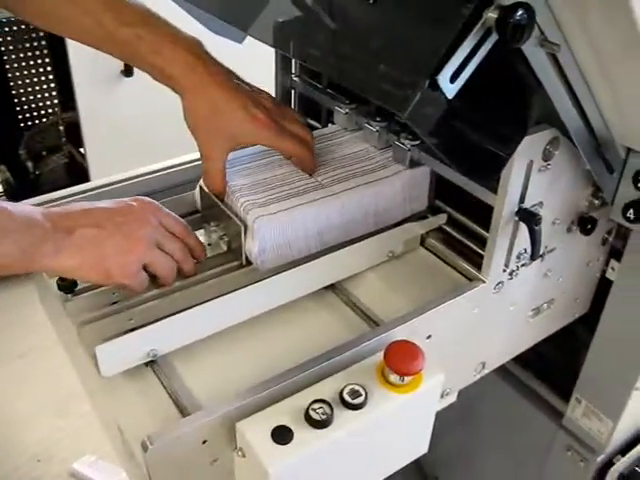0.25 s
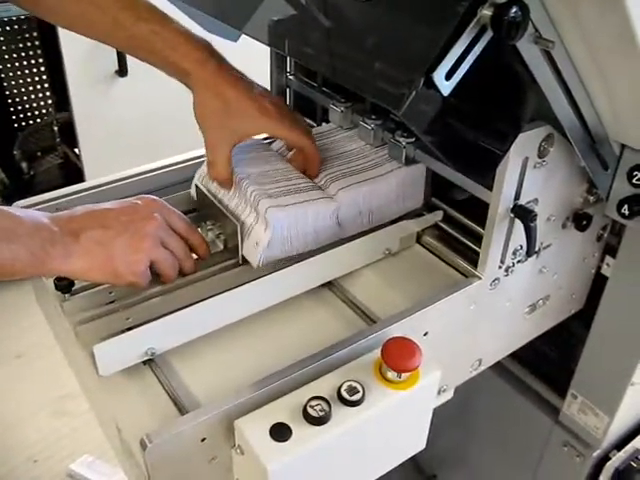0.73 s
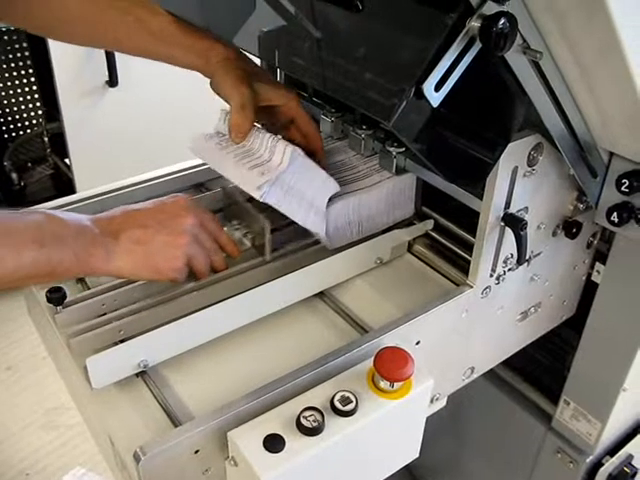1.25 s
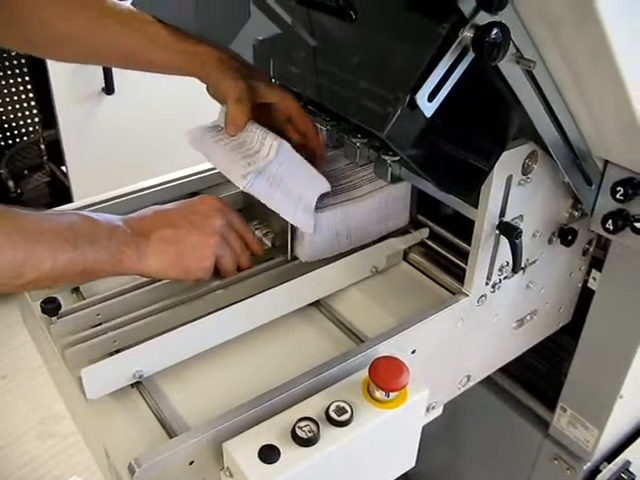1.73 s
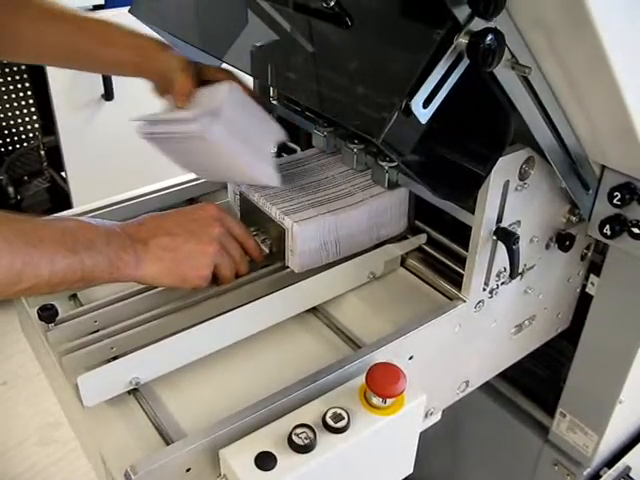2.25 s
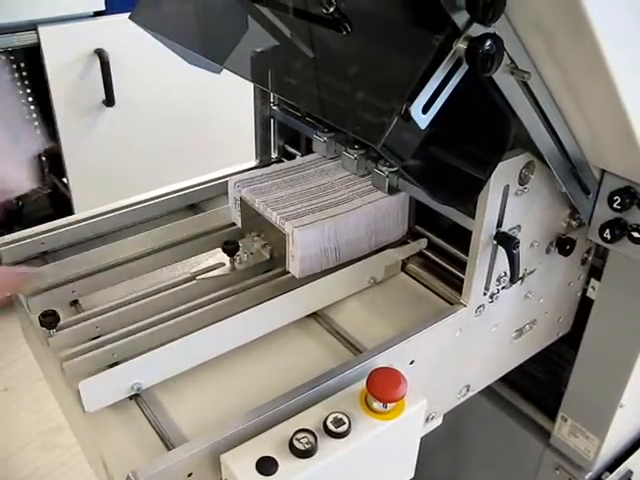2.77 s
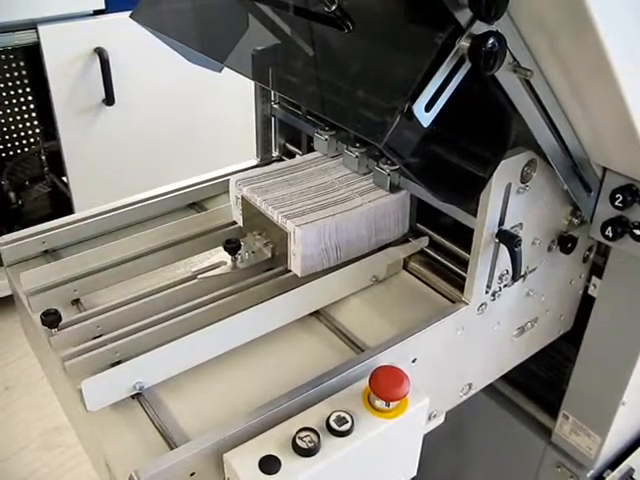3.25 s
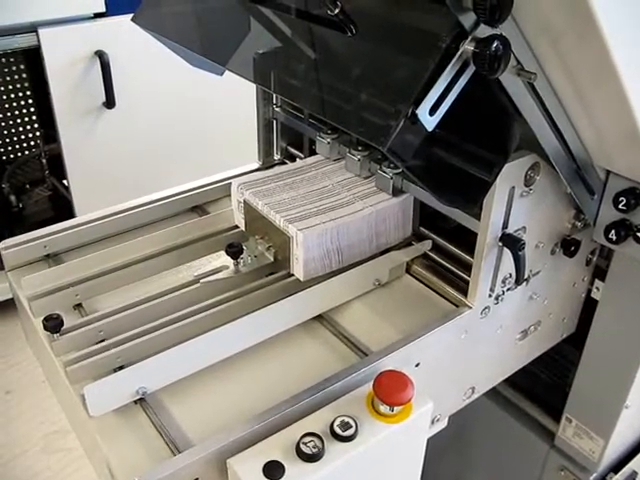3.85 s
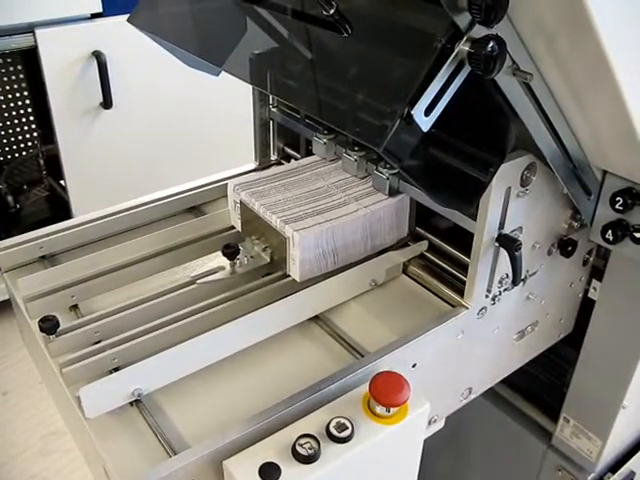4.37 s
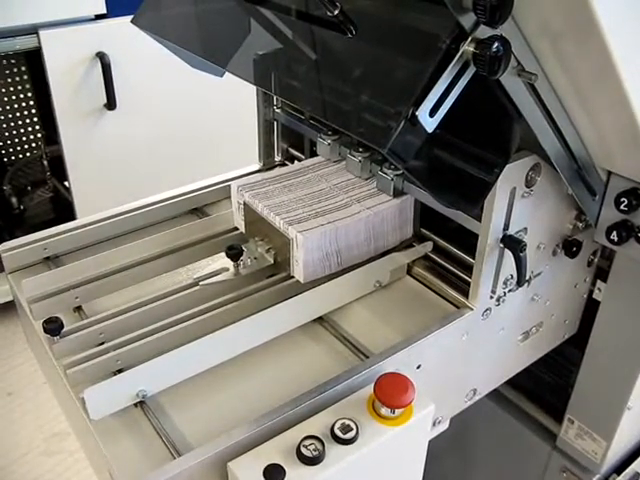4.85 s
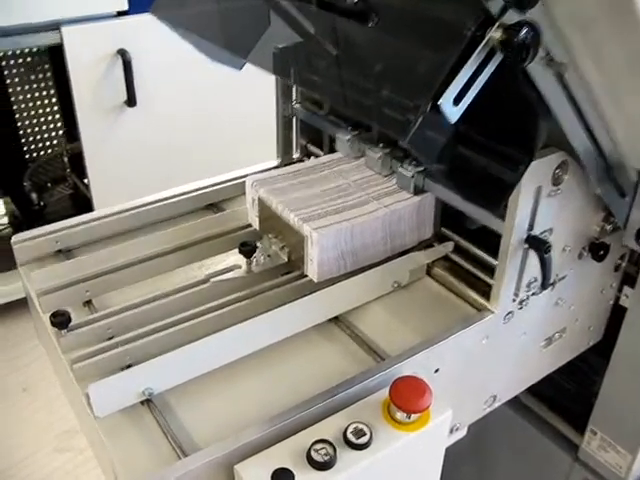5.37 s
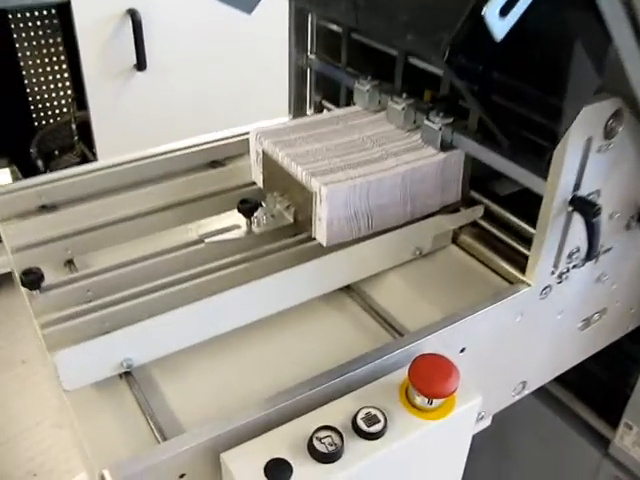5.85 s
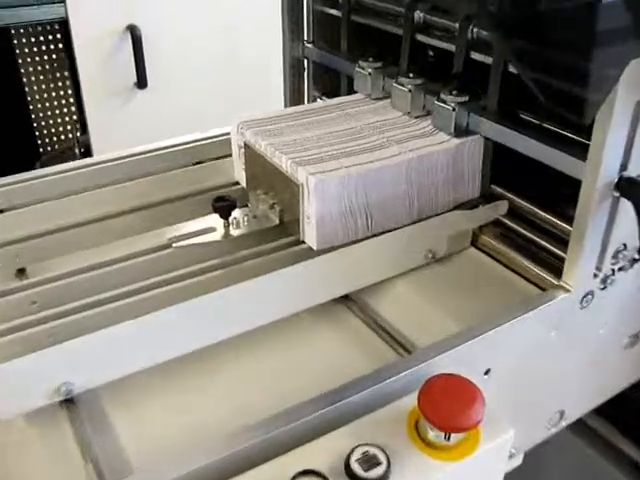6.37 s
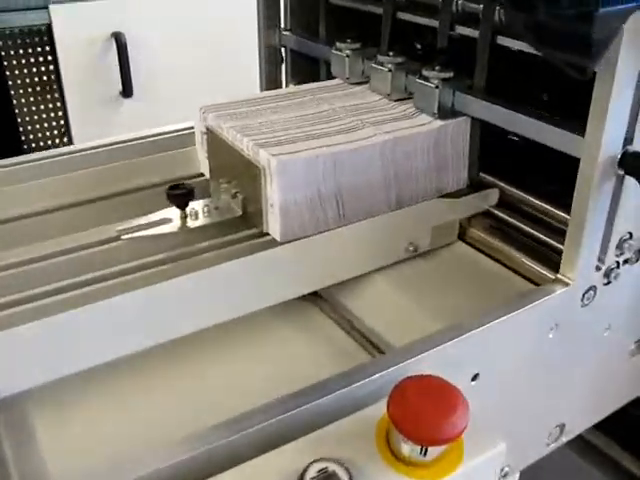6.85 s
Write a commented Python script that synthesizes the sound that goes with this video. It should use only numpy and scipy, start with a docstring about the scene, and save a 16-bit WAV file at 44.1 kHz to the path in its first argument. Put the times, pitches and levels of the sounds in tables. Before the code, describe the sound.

A paper folding machine snaps through sheets in a quick, even rhythm over hissing, whistling air and a steady hum.

```python
"""Quick triple snaps of paper, seven a second, over hissing, whistling air: a print shop's folding
machine, heard from just above its feed table. Air blows into the stack and sheets are sucked off it.
Each knocks twice on the fold plate and thumps out through the rollers, over the hum of the drive.
Near the end the sheets run late and crowd in the folder, then the folder empties and falls quiet."""
import sys
import numpy as np
from scipy import signal
from scipy.fft import rfft, irfft
from scipy.io import wavfile
from scipy.ndimage import uniform_filter1d, map_coordinates

SR = 44100
rng = np.random.default_rng(int(sys.argv[2]) if len(sys.argv) > 2 else 0)


def bounce(signal):
    """Save signal as a 16-bit WAV file at the path given by the first command-line argument."""
    frames = np.transpose(np.atleast_2d(signal))
    limited = np.clip(frames, -1, 1)
    pcm = np.round(limited * 32767).astype(np.int16)
    wavfile.write(sys.argv[1], SR, pcm)


N = 313551
TIME = np.arange(N) / SR
EMPTY_S, RUN_OUT_S = 6.69, .14  # folder empties: start, duration

# Paper click spectra: f/Hz, level/dB
PICKUP_SPECTRUM = [(300, -42), (1200, -13), (2400, -2.5), (3200, 1), (4100, 0), (5100, 1), (6200, -8),
                   (8300, -4.5), (15000, -43)]
FLICK_SPECTRUM = [(300, -39.5), (1200, -8.5), (2200, -1), (3000, 4.5), (4200, 4), (5000, -10), (6500, -8),
                  (8100, -2), (9200, -6), (15000, -44)]
SNAP_SPECTRUM = [(200, -25), (700, -11), (950, -8), (1250, -1.5), (1700, -2.5), (2000, -.5), (2500, .5),
                 (3300, -3.5), (4200, -6.5), (5400, -7.5), (8000, -13), (10000, -22), (15000, -29)]
# Sheets leaving the stack: snap t/s, relative flick level/dB, relative snap level/dB
SHEETS = [(.0282, -19, -13.5), (.1749, -15.5, -15.5), (.322, -17.5, -17), (.462, -22, -29),
          (.5996, -18, -16), (.7428, -17.5, -23), (.8857, -17.5, -17), (1.0344, -19.5, -14.5),
          (1.1846, -21, -16), (1.324, -21, -16), (1.4668, -20, -16), (1.614, -16.5, -17), (1.758, -17, -17),
          (1.9031, -18, -18), (2.0408, -21, -14), (2.187, -17.5, -18), (2.3283, -15.5, -13),
          (2.476, -16.5, -15), (2.6256, -18, -17), (2.7667, -19, -19), (2.9168, -16.5, -23),
          (3.0535, -46, -30), (3.2017, -24, -22), (3.347, -19, -15), (3.4852, -16.5, -15),
          (3.6273, -15.5, -15), (3.771, -18.5, -17), (3.9136, -23, -15), (4.059, -16.5, -15),
          (4.2065, -20, -14), (4.3443, -14.5, -21), (4.5018, -17, -21), (4.6427, -17, -18),
          (4.7887, -16, -12), (4.9315, -16.5, -19), (5.0706, -16.5, -13), (5.22, -17, -15),
          (5.3614, -20, -13), (5.5156, -18.5, -15), (5.6534, -16, -19.5), (5.8198, -16.5, -13.5),
          (5.9691, -15.5, -17), (6.124, -17.5, -13), (6.2865, -23, -11), (6.4292, -24, -10.5),
          (6.5857, -15, -11), (6.7613, -20, -20), (6.9125, -16, -11.5)]


def feeder(pickup_db=-18, pickup_follow=.33, crowded_db_per_s=35, flick_gain_db=2, snap_gain_db=3,
           valve_db=-27, grip_db=-27):
    """Per sheet: the valve ticks; the sheet lifts, flicks, snaps free and is gripped by the rollers."""
    out = np.zeros(N)
    pickup, flick, snap = impulse(PICKUP_SPECTRUM), impulse(FLICK_SPECTRUM), impulse(SNAP_SPECTRUM)
    median_flick_db = np.median(np.array(SHEETS)[:, 1])
    for s, flick_db, snap_db in SHEETS:
        lift_db = pickup_db + pickup_follow * (flick_db - median_flick_db) + crowded_db_per_s * delay(s)
        loose = undb(-.5 * (snap_db + 13))  # harder snap, cleaner crack
        add(out, s - .041, crack(snap, valve_db, scatter=(.47, .0069), tail=(.13, .0091)))
        add(out, s - .0265, crack(pickup, lift_db, scatter=(.21, .0046), tail=(.075, .0076)))
        add(out, s - .0129, crack(flick, flick_db + flick_gain_db,
                                  scatter=(.14, .0074), tail=(.041, .013)))
        add(out, s, crack(snap, snap_db + snap_gain_db,
                          scatter=(.088 * loose, .004), tail=(.012 * loose, .0085)))
        add(out, s + .037, crack(pickup, grip_db, scatter=(.097, .0017), tail=(.021, .0091)))
    return out


def crack(click, db, scatter, tail):
    """One paper crack; creases and panels scatter it, the housing adds a tail. Both: (gain, decay/s)."""
    t = TIME[:4096]
    envelope = sum(gain * np.exp(-t / decay_s) for gain, decay_s in (scatter, tail))
    push = rng.standard_normal(len(t)) * envelope
    push[0] += 1
    return at_level(signal.fftconvolve(push, click), db, size=130)


# Feeder bracket modes: f/Hz, width/Hz, relative level/dB
BRACKET_MODES = [(2420, 61, 1), (2523, 57, -3.5), (2944, 60, -4), (3370, 36, -2.5), (3895, 67, -5.5)]


def brackets(snaps, ring_db=-1):
    """The snaps plus the ringing they excite in the feeder's metal brackets."""
    ringing = sum(undb(db) * resonance(snaps, hz, width_hz) for hz, width_hz, db in BRACKET_MODES)
    return snaps + undb(ring_db) * ringing


# Air hiss spectrum: f/Hz, relative density/dB
AIR_SPECTRUM = [(300, -22.5), (1000, -3.5), (2500, -3.5), (4000, -1), (4800, -2.5), (7400, -2.5),
                (8400, -0.5), (9400, -1.5), (10700, 0), (12200, 3), (13800, 0), (14800, -2), (15700, -15)]
# Edge whistles: f/Hz, flutter/Hz, start level/dB, rise/(dB/s)
WHISTLES = [(3978, 10, -52, 1.8), (4170, 14, -43, .1), (8340, 85, -43, .7), (12480, 150, -49, .7)]


def air(hiss_db=-23, flutter_db=.5, choke_s=.015, choke_above_hz=6000):
    """Blown air hisses in the stack and whistles on its edges; each sheet chokes the high whistles."""
    out = noise(AIR_SPECTRUM) * undb(hiss_db + flutter_db * drift(16))
    clear = np.prod([1 - np.exp(-((TIME - s) / choke_s) ** 2) for s, _, _ in SHEETS], axis=0)
    for hz, flutter_hz, db, rise_db_per_s in WHISTLES:
        gate = clear if hz > choke_above_hz else 1
        out += whistle(hz, flutter_hz, rate_hz=120) * undb(db + rise_db_per_s * TIME) * gate
    return out


def whistle(hz, flutter_hz, rate_hz):
    """Jet tone, fluttering in pitch and level."""
    cycles = np.cumsum(hz + flutter_hz * drift(rate_hz)) / SR
    return unit(np.sin(2 * np.pi * cycles) * undb(2 * drift(rate_hz)))


# Whistle flares: t/s, duration/s, f/Hz, level/dB
SQUEALS = [(0.197, .6, 4175, -40), (.35, .5, 11473, -33), (1.08, 0.055, 11473, -28),
           (1.26, 0.22, 11473, -33), (0.948, .5, 13190, -40), (6.24, .14, 3978, -34),
           (6.29, .08, 4175, -32), (6.56, 0.23, 4175, -32), (6.56, 0.63, 3978, -41.5),
           (6.76, .13, 8330, -27), (6.8, 0.29, 4175, -37.5), (6.957, .14, 8330, -34)]


def squeals(ramp_s=.014, flutter=.00411):
    """A sheet edge catches the jet: the whistle swells, holds and dies."""
    out = np.zeros(N)
    pitches_hz = sorted({hz for _, _, hz, _ in SQUEALS})
    jets = {hz: whistle(hz, flutter * hz, rate_hz=100) for hz in pitches_hz}
    for s, length_s, hz, db in SQUEALS:
        envelope = np.clip(np.minimum(TIME - s, s + length_s - TIME) / ramp_s, 0, 1)
        out += jets[hz] * undb(db) * envelope
    return out


# Fold plate modes: f/Hz, relative level/dB
PLATE_MODES = [(684, 0), (655, -10), (505, -14)]


def fold_plate():
    """Each sheet knocks on the plate, then buckles and rebounds more softly."""
    knocks = each_cycle(lag_s=.007, delay_share=1, db=-29, rise_db_per_s=.31,
                        crowded_db_per_s=17, jitter_s=.00192, jitter_db=.5)
    rebounds = each_cycle(lag_s=.075, delay_share=.25, db=-35.5, rise_db_per_s=.6,
                          crowded_db_per_s=3, jitter_s=.006, jitter_db=2.4)
    return blows([*knocks, *rebounds], PLATE_MODES, swell_s=.011, fade_s=.0098, wobble=.024)


# Roller modes: f/Hz, relative level/dB
ROLLER_MODES = [(213, 0), (428, -.5), (306, -11)]


def delivery():
    """Each folded sheet thumps out through the rollers."""
    thumps = each_cycle(lag_s=.064, delay_share=.62, db=-35, rise_db_per_s=.27,
                        crowded_db_per_s=3, jitter_s=.002, jitter_db=1)
    return blows(thumps, ROLLER_MODES, swell_s=.022, fade_s=.011, wobble=.018)


def each_cycle(lag_s, delay_share, db, rise_db_per_s, crowded_db_per_s, jitter_s, jitter_db):
    """One blow (t/s, level/dB) per sheet fed before EMPTY_S; crowded sheets hit later and harder."""
    snap_s = np.array([s for s, _, _ in SHEETS if s < EMPTY_S])
    late, uneven = rng.standard_normal((len(snap_s), 2)).T
    times_s = snap_s + lag_s + delay_share * delay(snap_s) + jitter_s * late
    levels_db = db + rise_db_per_s * snap_s + crowded_db_per_s * delay(snap_s) + jitter_db * uneven
    return zip(times_s, levels_db)


def blows(events, modes, swell_s, fade_s, wobble):
    """Paper pushes softly: the struck part's modes swell, waver under the sheet and fade."""
    out = np.zeros(N)
    t = TIME[:8192] - TIME[2048]
    envelope = np.where(t < 0, np.exp(-(t / swell_s) ** 2), 1 / np.cosh(t / fade_s))
    for s, db in events:
        body = 0
        for hz, mode_db in modes:
            waver = unit(uniform_filter1d(rng.standard_normal(len(t)), size=500))
            cycles = np.cumsum(hz * (1 + wobble * waver)) / SR
            cycles -= cycles[np.argmax(envelope)]  # one push: modes in phase at the peak
            body = body + undb(mode_db) * np.sin(2 * np.pi * cycles)
        add(out, s + t[0], at_level(body * envelope, db, size=700))
    return out


# Crowding in the folder: t/s, delay/s
CROWDING = [(0, 0), (4.3, 0.0031), (5.22, 0.0015), (5.36, 0.027), (5.97, .031), (6.12, 0.055),
            (6.29, 0.077), (6.6, 0.077)]


def delay(s):
    """Sheet delay/s at time s; every crowded_db_per_s is per second of this delay."""
    return np.interp(s, *np.transpose(CROWDING))


def emptied():
    """Ramp from 0 (paper in the folder) to 1 (run out)."""
    return np.clip((TIME - EMPTY_S) / RUN_OUT_S, 0, 1)


# Paper path spectrum: f/Hz, relative density/dB
RUSTLE_SPECTRUM = [(25, -38), (50, -41), (75, -17), (100, -15.5), (150, -8.5), (250, -3.5), (560, 1.5),
                   (900, -0.5), (1250, -2), (2400, 3), (3400, -4), (4800, -13), (9000, -11.5)]


def rustle(db=-28, grain_db=2, empty_db=-5):
    """Sheets rustle unevenly between the rollers."""
    return noise(RUSTLE_SPECTRUM) * unit(undb(grain_db * drift(140))) * undb(db + empty_db * emptied())


# Plate drone: f/Hz, width/Hz, level/dB, rise/(dB per s of delay), change when empty/dB
PLATE_DRONE = [(519.7, 35, -49.5, 72, 2.5), (675, 102, -39, 40, -17)]


def plate_drone():
    """The fold plate sings under sliding sheets, louder as they crowd."""
    return sum(tone(hz, width_hz) * undb(db + crowded_db_per_s * delay(TIME) + empty_db * emptied())
               for hz, width_hz, db, crowded_db_per_s, empty_db in PLATE_DRONE)


def crinkle(db=-47, grain_db=5, crowded_db_per_s=160, empty_db=-16):
    """Dense small creases of bending sheets, louder as they crowd."""
    level_db = db + crowded_db_per_s * delay(TIME) + empty_db * emptied()
    return unit(tone(1200, width_hz=550) * undb(grain_db * drift(300))) * undb(level_db)


# Frame hum: f/Hz, width/Hz, level/dB
FRAME_HUM = [(138.2, 14, -57.5), (216, 78, -48.5), (348, 22, -52.5), (439, 12, -52), (1253, 82, -49.5),
             (1977, 15, -50), (3376, 25, -55), (12100, 56, -52)]


def frame_hum():
    """The drive keeps the frame humming."""
    return sum(undb(db) * tone(hz, width_hz) for hz, width_hz, db in FRAME_HUM)


# Feeder ringing: t/s, level/dB
RING_LEVEL = [(0, -44), (2.4, -40.5), (2.9, -50), (5.5, -45), (7.11, -45)]


def feeder_ring():
    """Thin, continuous metallic ringing in the feeder."""
    level_db = np.interp(TIME, *np.transpose(RING_LEVEL))
    return tone(2389, width_hz=69) * undb(level_db)


def shop(x, wet_db=-13, t60_s=.35, cutoff_hz=4000, predelay_s=.008):
    """Direct sound plus faint, dull workshop reverberation."""
    t = TIME[:22050]
    lowpass = signal.butter(1, cutoff_hz, fs=SR, output="sos")
    tail = signal.sosfilt(lowpass, rng.standard_normal(len(t)))
    tail = tail * undb(-60 * t / t60_s) * (t > predelay_s)
    return x + undb(wet_db) * signal.fftconvolve(x, tail / np.linalg.norm(tail))[:N]


def undb(db):
    """Decibels to gain."""
    return 10 ** (np.asarray(db) / 20)


def unit(x):
    """Scale to rms 1."""
    return x / np.sqrt(np.mean(x ** 2))


def at_level(x, db, size):
    """Scale the loudest stretch of size samples to rms level db."""
    return x * undb(db) / np.sqrt(uniform_filter1d(x ** 2, size).max())


def add(out, s, x):
    """Mix x in at time s."""
    onset = int(round(s * SR))
    start, end = max(onset, 0), min(onset + len(x), N)
    if end > start:
        out[start:end] += x[start - onset:end - onset]


def gains(spectrum, size):
    """Spectrum (f/Hz, level/dB) to FFT bin gains."""
    hz, db = np.transpose(spectrum)
    bins_hz = np.fft.rfftfreq(size, 1 / SR)
    return undb(np.interp(np.log(bins_hz + 1), np.log(hz), db))


def noise(spectrum):
    """Shaped noise, rms 1."""
    return unit(irfft(rfft(rng.standard_normal(N)) * gains(spectrum, N), N))


def impulse(spectrum, size=512):
    """Minimum-phase click with this spectrum."""
    cepstrum = irfft(np.log(gains(spectrum, size)))
    cepstrum[1:size // 2] *= 2
    cepstrum[size // 2 + 1:] = 0
    return irfft(np.exp(rfft(cepstrum)))


def resonance(x, hz, width_hz):
    """Two-pole band-pass."""
    return signal.lfilter(*signal.iirpeak(hz, hz / width_hz, fs=SR), x)


def tone(hz, width_hz):
    """Wavering tone: noise twice through one resonance."""
    band = resonance(rng.standard_normal(N), hz, width_hz)
    return unit(resonance(band, hz, width_hz))


def drift(rate_hz):
    """Smooth random drift, rms 1."""
    steps = rng.standard_normal(1024)
    return unit(map_coordinates(steps, [TIME * rate_hz], order=2, mode="wrap"))


def limiter(x, threshold_db=-18, slope=.22, release_s=.07):
    """Each snap pulls the gain down at once; it recovers before the next sheet."""
    level = np.sqrt(uniform_filter1d(x ** 2, size=130) + 1e-12)
    fall = TIME / release_s
    held = np.exp(np.maximum.accumulate(np.log(level) + fall) - fall)  # decaying peak hold
    gain = np.minimum(1, undb(threshold_db) / held) ** slope
    return x * uniform_filter1d(gain, size=64)


def scene():
    """Mono mix: reverberant feeder snaps, dry machine body and air."""
    body = fold_plate() + plate_drone() + delivery() + rustle() + frame_hum() + feeder_ring() + crinkle()
    snaps = shop(brackets(feeder()))
    return (snaps + body + air() + squeals())[None]


def record(dry, cutoff_hz=15750):
    """Limiter, soft clip, steep low-pass."""
    rounded = np.tanh(limiter(dry[0]))
    lowpass = signal.ellip(12, .1, 80, cutoff_hz, fs=SR, output="sos")
    return signal.sosfilt(lowpass, rounded)[None]


dry = scene()
out = record(dry)
bounce(out)
```